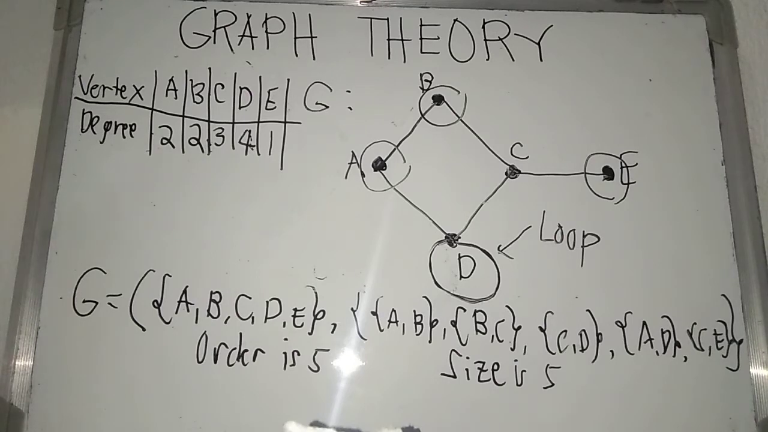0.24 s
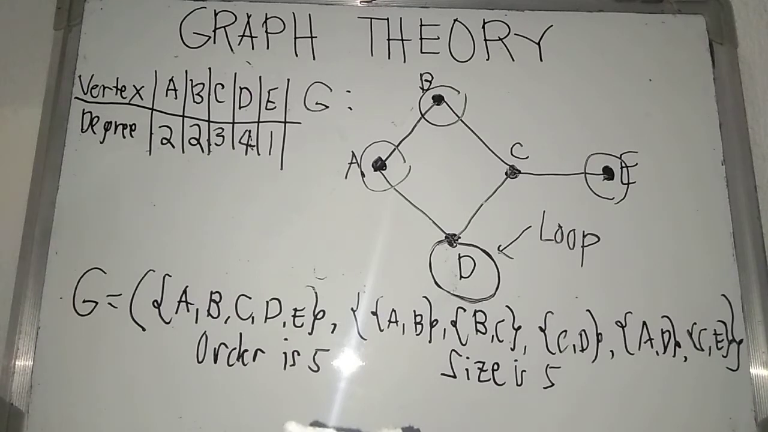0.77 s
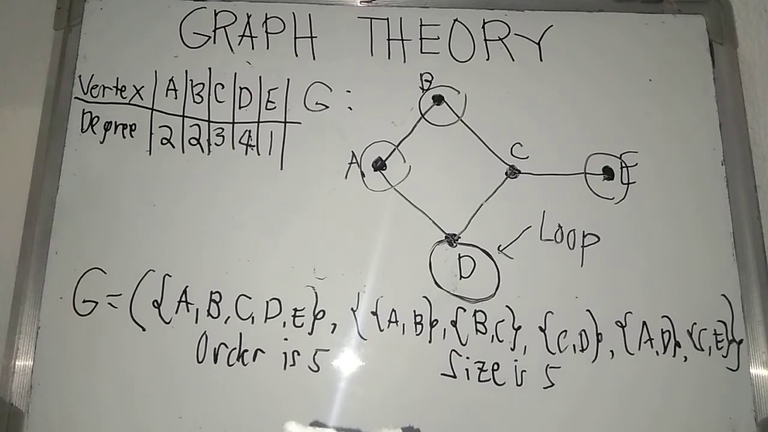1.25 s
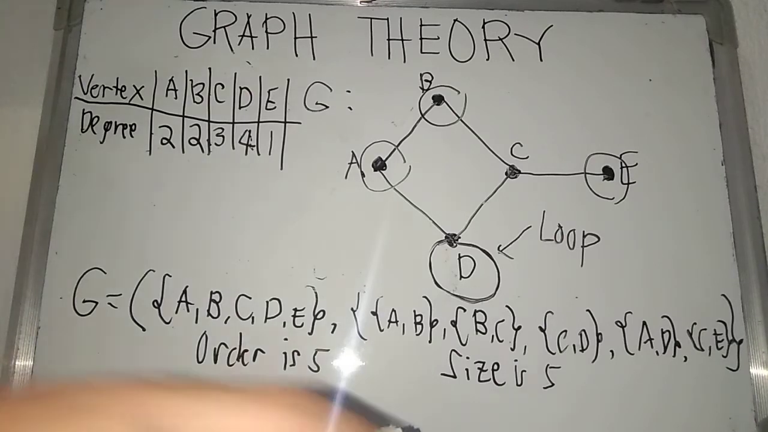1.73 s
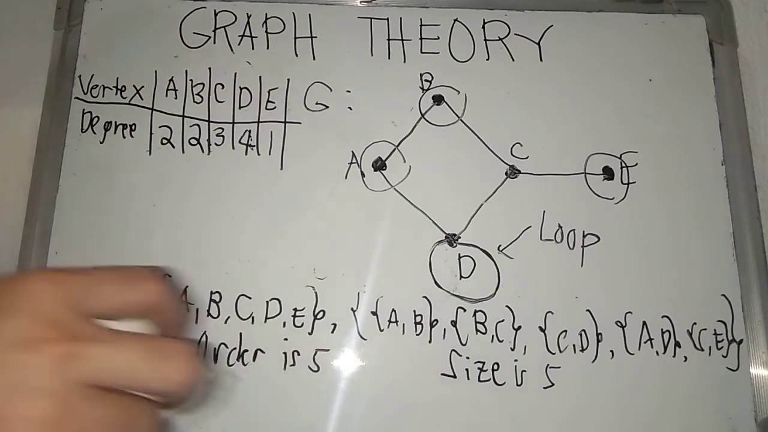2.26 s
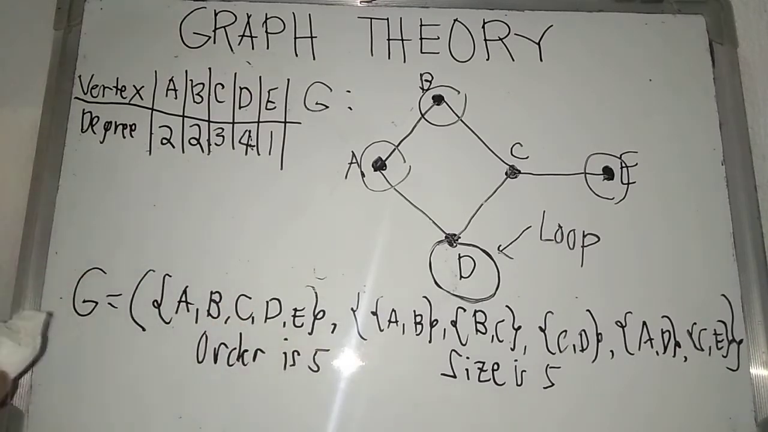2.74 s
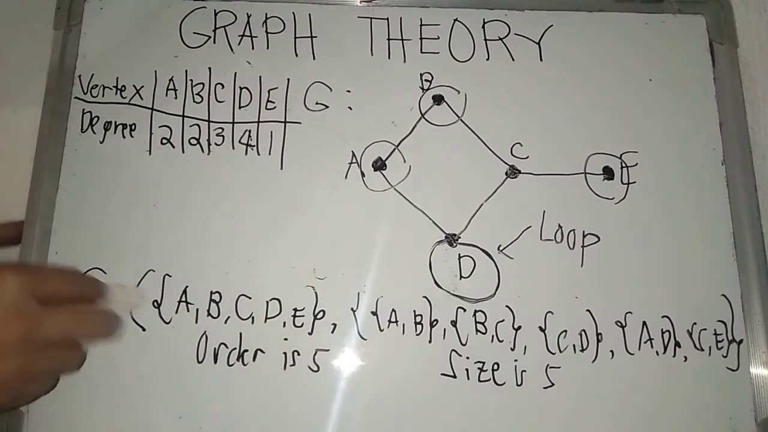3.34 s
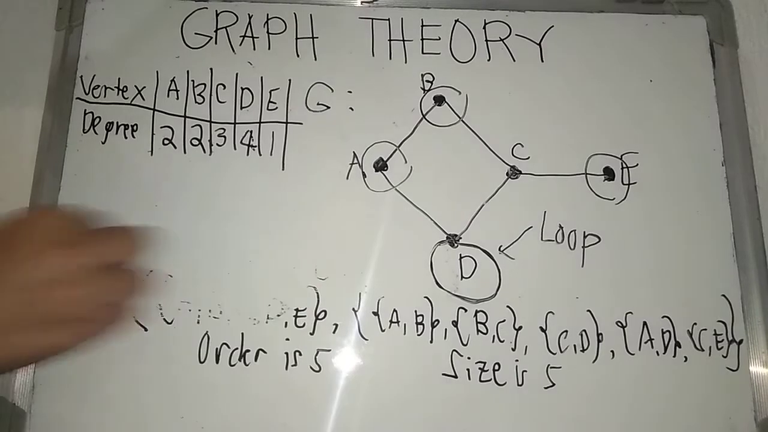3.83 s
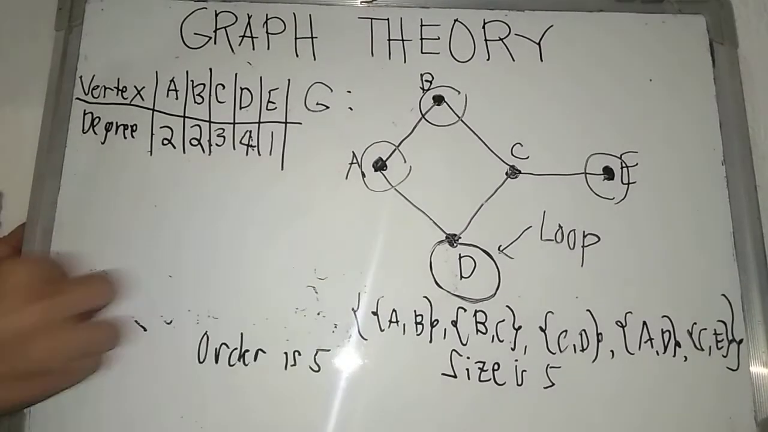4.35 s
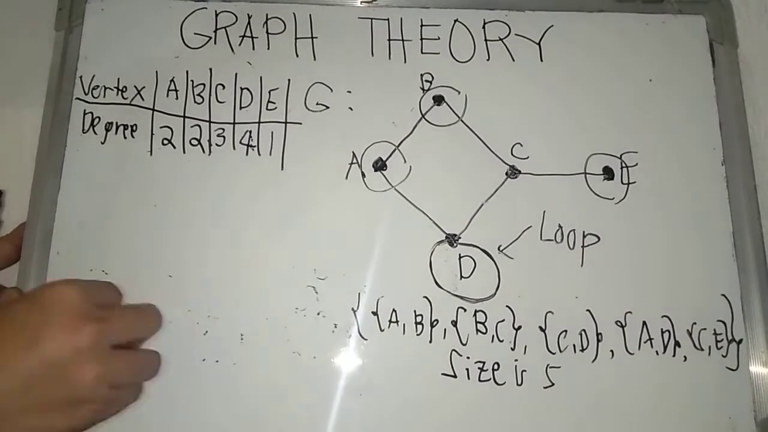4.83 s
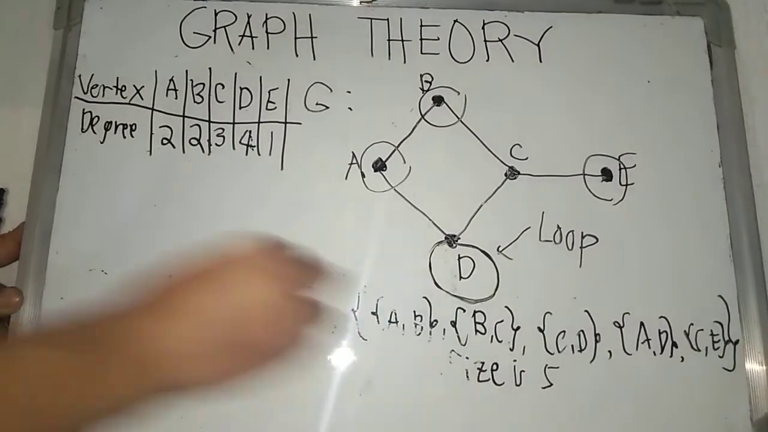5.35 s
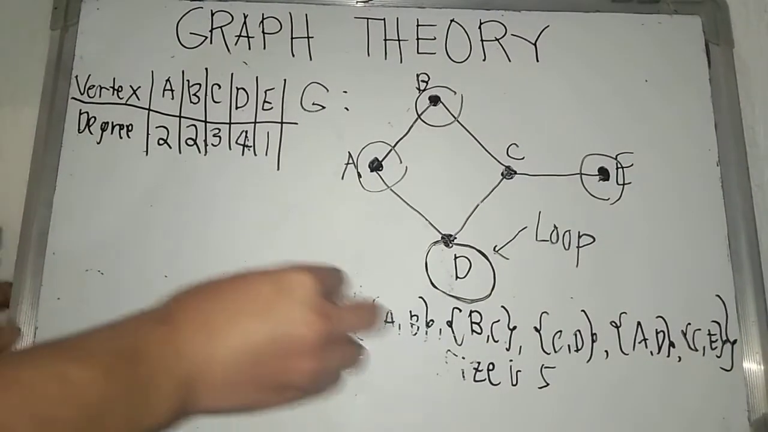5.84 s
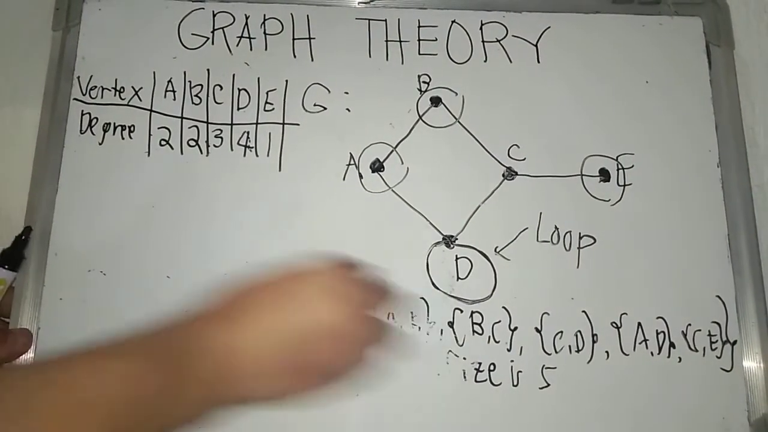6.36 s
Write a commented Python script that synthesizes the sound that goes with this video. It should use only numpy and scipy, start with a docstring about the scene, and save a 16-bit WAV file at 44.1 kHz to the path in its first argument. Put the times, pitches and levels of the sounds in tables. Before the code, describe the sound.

Quiet humming room, then a tick and quick soft wipes on a whiteboard, growing into regular swishing strokes with hollow board knocks.

```python
"""A wad of paper tissue wipes marker writing off a whiteboard: fibre-slip noise, swept by hand speed.
The loose board knocks on the wall through its own resonances; soft thumps are damped low bumps.
Hard contacts tick as short coloured clicks; stick-slip squeaks are brief gliding harmonic tones.
Behind: a small room's reflections, harmonic mains hum, resonant low drone and steady hiss.
"""
import sys
import numpy as np
from scipy import signal
from scipy.fft import rfft, irfft, next_fast_len
from scipy.io import wavfile
from scipy.ndimage import uniform_filter1d, map_coordinates

SR = 44100
rng = np.random.default_rng(int(sys.argv[2]) if len(sys.argv) > 2 else 0)


def master_out(mix):
    """Clip the mix to full scale and print it as 16-bit PCM to the path in sys.argv[1]."""
    frames = np.transpose(np.atleast_2d(mix))
    ceiling = np.clip(frames, -1, 1)
    pcm = np.round(ceiling * 32767).astype(np.int16)
    wavfile.write(sys.argv[1], SR, pcm)


N = 290663


def amp(db):
    """Decibels to gain."""
    return 10 ** (np.asarray(db) / 20)


def unit(x):
    """Scale to rms 1."""
    return x / np.sqrt(np.mean(x ** 2) + 1e-20)


def along(points, hz):
    """Interpolate (Hz, value) points on a log frequency axis."""
    point_hz, value = np.transpose(points)
    return np.interp(np.log(hz + 1), np.log(point_hz + 1), value)


def wobble(knots_per_s):
    """Smooth random curve through normally distributed knots."""
    knots = rng.standard_normal(int(N * knots_per_s / SR) + 4)
    return map_coordinates(knots, [np.arange(N) * knots_per_s / SR])


def filtered(x, response):
    """Multiply the spectrum of x by response(hz), zero-padded."""
    size = next_fast_len(len(x) + SR // 2)
    hz = np.fft.rfftfreq(size, 1 / SR)
    return irfft(rfft(x, size) * response(hz), size)[:len(x)]


def coloured(x, spectrum):
    """Filter x by a (Hz, dB) spectrum, then scale to rms 1."""
    return unit(filtered(x, lambda hz: amp(along(spectrum, hz))))


def resonance(hz, centre_hz, width_hz):
    """Response of one damped resonance."""
    damping = 1j * hz * width_hz
    return damping / (centre_hz ** 2 - hz ** 2 + damping)


def impulse(spectrum, size=2048):
    """Minimum-phase click with the given spectrum, by folding its cepstrum."""
    log_gain = np.log(amp(along(spectrum, np.fft.rfftfreq(size, 1 / SR))))
    cepstrum = irfft(log_gain)
    cepstrum[1:size // 2] *= 2
    cepstrum[size // 2 + 1:] = 0
    return irfft(np.exp(rfft(cepstrum)))


def add(track, time_s, peak_db, sound):
    """Mix a sound into the track at the given time and peak level."""
    part = track[max(round(time_s * SR), 0):][:len(sound)]
    part += amp(peak_db) * sound[:len(part)] / np.abs(sound).max()


def friction(slips_per_s, spread_db, smooth):
    """Countless fibre slips of uneven size, the smallest merging into noise."""
    slipping = rng.random(N) < slips_per_s / SR
    slips = slipping * rng.standard_normal(N) * amp(spread_db * rng.standard_normal(N))
    return unit(slips) + smooth * rng.standard_normal(N)


def patchy(x, depth_db):
    """The contact patch shifts, so bands of the rub swell and fade."""
    bins = signal.stft(x, nperseg=512)[2]
    field = uniform_filter1d(rng.standard_normal(bins.shape), size=6, axis=0)
    field = uniform_filter1d(field, size=10, axis=1)
    return signal.istft(bins * amp(depth_db * unit(field)), nperseg=512)[1][:N]


def sweep(start_s, length_s, law):
    """The hand speeds up from one turn and slows into the next; friction is speed to the power law."""
    u = np.clip((np.arange(N) / SR - start_s) / length_s, 0, 1)
    return (4 * u * (1 - u)) ** law


SPEED_LAW = 0.76  # exponent for the tissue
PRESS_LAW = 0.32  # exponent for board and heel: lasts further into the turns
# sweeps of the wad, turn to turn: (start [s], length [s], relative hiss [dB], relative board rub [dB])
STROKES = [(1.925, 0.077, -59.5, -70.5), (1.976, .135, -55, -56), (2.142, 0.1, -57.5, -58.5),
           (2.222, 0.17, -65.5, -74), (2.408, .19, -63.5, -64), (2.618, .13, -62.5, -78),
           (2.691, 0.13, -65, -56.5), (2.802, 0.13, -55.5, -57.5), (2.926, .18, -62, -63.5),
           (3.095, 0.21, -65.5, -71.5), (3.282, 0.24, -58.5, -64.5), (3.49, 0.3, -54, -55),
           (3.742, 0.26, -57, -60.5), (3.976, 0.26, -51.5, -56), (4.223, 0.25, -55.5, -61),
           (4.455, .23, -52, -59), (4.68, 0.23, -56.5, -60.5), (4.901, .26, -54, -59.5),
           (5.136, 0.21, -55, -62.5), (5.353, .15, -58, -64.5), (5.716, 0.15, -63, -64),
           (5.876, 0.12, -64.5, -64.5), (5.987, .2, -55.5, -56.5), (6.186, 0.18, -57, -62.5),
           (6.359, 0.22, -56, -65)]
# heel of the hand dragging on the board: (start [s], length [s], relative level [dB])
DRAGS = [(3.4, .25, -67), (4.0, .88, -73.5), (4.9, 0.63, -63.5), (5.591, .07, -64), (5.789, 0.113, -63.5),
         (5.949, 0.14, -61), (6.425, 0.18, -65.5)]
# steady microphone hiss, two faint rustles swelling out of it, last level held to the end:
# (time [s], level [dB])
HISS_AND_RUSTLES = [(0, -76.5), (.2, -72), (.33, -65.5), (.45, -71.5), (.6, -74.5), (1.32, -75),
                    (1.42, -67.5), (1.52, -73.5)]
# tissue fibre spectrum: (frequency [Hz], relative level [dB])
TISSUE = [(1500, -11.5), (3000, -7.5), (4500, -3.5), (6000, -1), (7000, 0.5), (7600, -6.5), (8500, -17.5),
          (10000, -24), (12000, -35.5), (15000, -31)]
# rubbed board spectrum: (frequency [Hz], relative level [dB])
RUB = [(400, -14), (900, -3), (1400, 0), (1900, 3.5), (3000, 3.5), (4500, -2), (7000, -71), (10000, -37)]
# dragging heel spectrum: (frequency [Hz], relative level [dB])
HEEL = [(150, -15), (300, -8.5), (500, -5), (800, -20.5), (1200, -14.5), (2000, -57), (4000, -55)]


def wiping():
    """Tissue hisses over microphone hiss, the board answers lower down, and the heel of the hand drags."""
    hiss = sum(amp(db) * sweep(s, length, SPEED_LAW) for s, length, db, _ in STROKES)
    rub = sum(amp(db) * sweep(s, length, PRESS_LAW) for s, length, _, db in STROKES)
    drag = sum(amp(db) * sweep(s, length, PRESS_LAW) for s, length, db in DRAGS)
    point_s, point_db = np.transpose(HISS_AND_RUSTLES)
    hiss_and_rustles = amp(np.interp(np.arange(N) / SR, point_s, point_db))
    grip = amp(0.79 * wobble(45))  # the wad catches and lets go

    fibres = coloured(patchy(friction(slips_per_s=4000, spread_db=1.5, smooth=1.16), depth_db=1.7), TISSUE)
    sheen = filtered(fibres, lambda hz: 1 / (1 + (8000 / (hz + 1)) ** 8))
    fibres = fibres + sheen * (0.51 * hiss / hiss.max() - 0.25)  # stronger hiss is brighter
    surface = coloured(patchy(friction(slips_per_s=2500, spread_db=3.5, smooth=1.56), depth_db=3.0), RUB)
    heel = coloured(friction(slips_per_s=500, spread_db=5.5, smooth=1.0), HEEL)

    bright = (amp(-2.5) * hiss + hiss_and_rustles) * fibres
    board = amp(-4.5) * rub * surface
    return grip * (bright + board + amp(0.5) * drag * heel)


CLACK_RATIO = 2.58  # frame pitch over panel pitch
CHATTER_GAP_S, CHATTER_DB, CHATTER_RATIO = 0.003, -4.5, 1.3  # mean spacing; last graze re blow; pitch re blow
CHATTER_GROWS_DB = 2  # per graze, towards the blow
# board against wall: (time [s], level [dB], centre [Hz], frame clack re panel [dB], chatter before blow [s])
KNOCKS = [(1.472, -54, 760, 1, 0), (3.7233, -31, 1180, -8.5, 0.0042), (3.9541, -41, 1250, 0.5, 0),
          (3.984, -40.5, 1220, -5, 0.0028), (4.6672, -30, 978, -1.5, 0.00095),
          (4.8928, -35.5, 997.7, -5.5, 0.0015), (4.92, -48, 1450, -20.5, 0.0038),
          (5.181, -52, 600, -8, 0.0038), (5.204, -51.5, 600, 0, 0), (5.228, -46.5, 900, -8, 0),
          (5.453, -50, 850, -10, 0.0011), (5.7234, -51, 1200, 2.5, 0), (5.807, -52.5, 1100, 4.5, 0.0015),
          (5.9704, -38, 720, -5, .009), (6.37, -52, 1050, -9, 0.0011), (6.44, -53, 1000, -8, 0),
          (6.543, -46.5, 910, -16, 0.0013)]


def contacts():
    """Yield (s, dB, Hz) per touch: a knock strikes panel and frame, with grazing chatter ahead of some."""
    for s, db, centre_hz, clack_db, chatter_s in KNOCKS:
        yield s, db, centre_hz
        yield s, db + clack_db, centre_hz * CLACK_RATIO
        for k in range(round(chatter_s / CHATTER_GAP_S)):
            early, colour = rng.standard_normal(2)
            graze_s = s - CHATTER_GAP_S * (k + 1 + 0.12 * early)
            graze_db = db + CHATTER_DB - k * CHATTER_GROWS_DB
            graze_hz = centre_hz * CHATTER_RATIO * np.exp(0.21 * colour)
            yield graze_s, graze_db, graze_hz


# board resonances: (centre [Hz], width [Hz], relative level [dB])
BOARD = [(460, 82, 12), (551.4, 12, 18.5), (773, 38, 3.5), (885, 120, -11), (1230, 83, -1), (1440, 91, -4),
         (1575, 98, 9), (2050, 70, 13), (2640, 60, -15)]


def knocks():
    """Each wall contact excites the board's resonances and a dispersive bending wave."""
    track, t = np.zeros(N), np.arange(SR // 5) / SR

    def body(hz):
        return 1 + sum(amp(db - 11.0) * resonance(hz, centre, width) for centre, width, db in BOARD)

    def travel(hz):
        return np.exp(-1j * np.pi / 2 * np.sqrt(hz))  # stiff panel: highs arrive first

    for s, db, centre_hz in contacts():
        rattle = 0.12 * amp(-60 * t / 0.025) * rng.standard_normal(len(t))
        blow = (t == 0) + rattle

        def contact(hz):
            return resonance(hz, centre_hz, 0.5 * centre_hz) / (1 + (hz / 5500) ** 4)

        add(track, s, db + 0.07, filtered(blow, lambda hz: contact(hz) * body(hz) * travel(hz)))
    return track


# soft pushes of the hand on the panel: (time [s], peak [dB], centre [Hz])
THUMPS = [(1.477, -55, 447), (3.581, -43.5, 330), (3.59, -40.5, 163), (3.61, -45.5, 192),
          (3.725, -37.5, 470), (5.205, -47, 423), (5.454, -48.5, 460), (5.792, -53, 219), (5.972, -43, 443)]


def thumps():
    """The whole panel gives under the hand: a push through a twice-applied broad resonance."""
    track, t = np.zeros(N), np.arange(SR // 5) / SR
    for s, db, centre_hz in THUMPS:
        push = (t == 0) + 0.044 * rng.standard_normal(len(t)) * amp(-60 * t / 0.103)
        add(track, s, db, filtered(push, lambda hz: resonance(hz, centre_hz, 0.37 * centre_hz) ** 2))
    return track


# fingernail and paper-crease ticks: (time [s], level [dB])
TICKS = [(1.9796, -29), (2.704, -46.5), (5.207, -48), (5.23, -50), (5.726, -42.5), (5.809, -42.5),
         (6.2145, -53)]
# tick spectrum: (frequency [Hz], relative level [dB])
TICK = [(300, -7), (1500, -14), (3000, -19), (3900, 7.5), (4700, -8), (5600, 4), (7000, 5), (8300, -15.5),
        (11000, -21), (15000, -48)]


def ticks():
    """A hard tiny contact rebounds once, scratches briefly and leaves a thin ring."""
    track, t = np.zeros(N), np.arange(SR // 20) / SR
    for s, db in TICKS:
        scratch = 0.17 * amp(-60 * t / 0.023) * rng.standard_normal(len(t))
        contact = (t == 0) + scratch
        contact[round(0.0025 * SR)] += 0.35  # rebound
        click = signal.fftconvolve(contact, impulse(TICK))[:len(t)]
        ring = amp(-41.0 - 60 * t / 0.14) * np.sin(2 * np.pi * 4000 * t)
        add(track, s, db + 0.5, click / np.abs(click).max() + ring)
    return track


# stick-slip squeaks: (time [s], length [s], nominal pitch [Hz], peak [dB], roughness [0-1])
SQUEAKS = [(3.43, 0.013, 4840, -54, 0), (3.433, 0.019, 874, -53, 0.03), (3.447, 0.03, 4940, -48.5, 0.15),
           (3.462, 0.0166, 1243, -54, 0.17), (3.95, 0.0159, 790, -40, 0.1),
           (3.9847, 0.0076, 1550, -38.5, 0.1), (4.46, 0.013, 1932, -33.5, 0),
           (5.956, 0.0109, 850, -42.5, .12)]


def squeaks():
    """The wad sticks and slips for milliseconds, pitch rising then levelling; uneven slips scrape."""
    track = np.zeros(N)
    for s, length_s, nominal_hz, db, rough in SQUEAKS:
        u = np.linspace(0, 1, round(length_s * SR))
        glide = 1.04 - 0.46 * (1 - u) ** 3
        pitch_hz = nominal_hz * (glide + rough * wobble(2465)[:len(u)])
        phase = 2 * np.pi * np.cumsum(pitch_hz) / SR
        harmonics = [k for k in range(1, 4) if k * nominal_hz < SR / 6]
        tone = sum(k ** -1.4 * np.sin(k * phase) for k in harmonics)
        add(track, s, db, tone * np.sin(np.pi * u) ** 2)
    return track


# reverberation: (frequency [Hz], t60 [s])
ROOM = [(200, 0.35), (1500, 0.22), (7000, 0.22)]


def room(x):
    """The walls answer after a gap, the far one distinctly; treble decays faster than bass."""
    hz, t, bins = signal.stft(rng.standard_normal(SR // 2), SR, nperseg=256)
    decay = amp(-60 * t / along(ROOM, hz)[:, None])
    tail = signal.istft(bins * decay, SR, nperseg=256)[1]
    tail = np.pad(tail / np.linalg.norm(tail), (round(0.005 * SR), 0))
    tail[round(0.027 * SR)] += 0.3  # far wall
    return signal.fftconvolve(x, tail)[:N]


HUM_HZ = 120.41
# mains hum: (multiple of HUM_HZ, mean level [dB rms])
HUM = [(1, -48), (2, -66), (3, -64), (5, -88.5)]
# low room resonances: (centre [Hz], relative width [Hz], relative level [dB])
DRONE = [(87, 31, -3.5), (115.4, 7, 6), (138.2, 26.7, 2.5), (219, 16, -4), (238, 17, 2.5), (276, 18, -4.5),
         (314, 19, -6), (366, 40, -12), (475, 48, -20)]
# steady hiss spectrum: (frequency [Hz], relative level [dB])
AIR = [(240, -66), (400, -48), (466, -5), (560, -5), (673, -4.5), (1070, -7.5), (1850, -7), (2430, -8.5),
       (2710, -8.5), (5910, -14), (9070, -29), (15500, -30)]


def background():
    """Slowly wavering mains harmonics, noise through low room resonances, and an even hiss."""
    phase = 2 * np.pi * HUM_HZ * np.arange(N) / SR + 0.011 * wobble(2.2)
    hum = np.zeros(N)
    for k, db in HUM:
        level = amp(db + 0.11 * wobble(2.9)) * np.sqrt(2)  # rms to peak
        hum += level * np.sin(k * phase + rng.uniform(0, 2 * np.pi))

    def modes(hz):
        power = sum(amp(2 * db) * np.abs(resonance(hz, c, 1.5 * w)) ** 4 for c, w, db in DRONE)
        return np.sqrt(power)

    drone = amp(-56.5) * unit(filtered(rng.standard_normal(N), modes))
    air = amp(-68.5) * coloured(rng.standard_normal(N), AIR)
    return hum + drone + air


def scene():
    """Everything reaches one microphone, the same on both channels."""
    rub, knock, tick, squeak = wiping(), knocks() + thumps(), ticks(), squeaks()
    direct = rub + knock + tick + squeak
    echoes = amp(-15.0) * room(rub) + amp(-8.5) * room(knock)
    echoes += amp(-9) * room(tick) + amp(-3.5) * room(squeak)
    return np.tile(direct + echoes + background(), (2, 1))


TOP_HZ = 15600


def record(dry):
    """Band limit: nothing is kept from TOP_HZ up."""
    return np.array([filtered(channel, lambda hz: hz < TOP_HZ) for channel in dry])


dry = scene()
out = record(dry)
master_out(out)
```